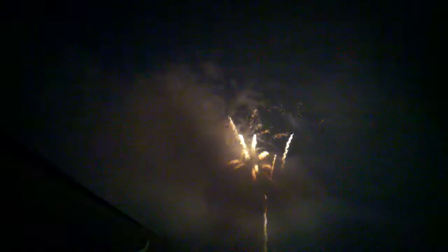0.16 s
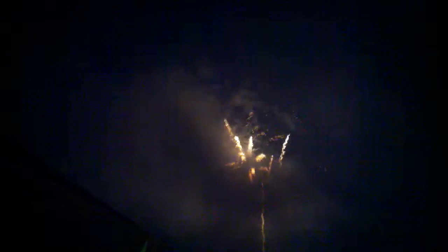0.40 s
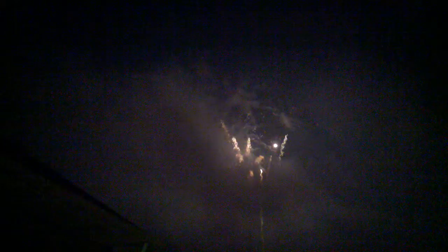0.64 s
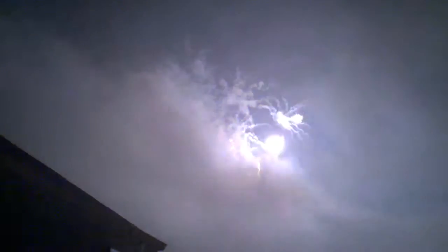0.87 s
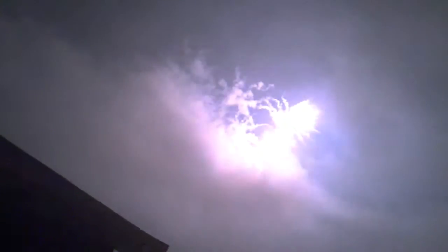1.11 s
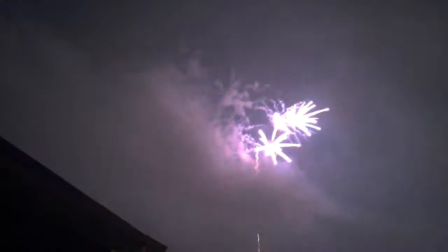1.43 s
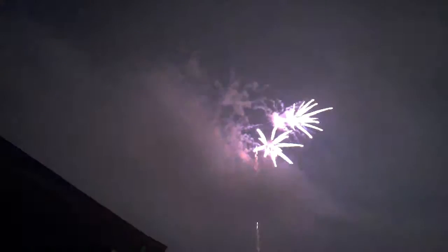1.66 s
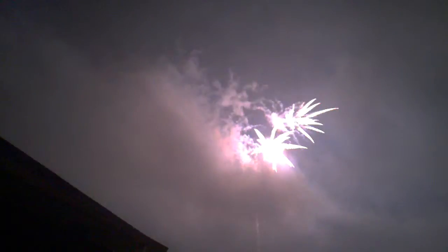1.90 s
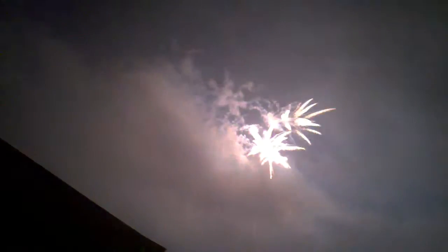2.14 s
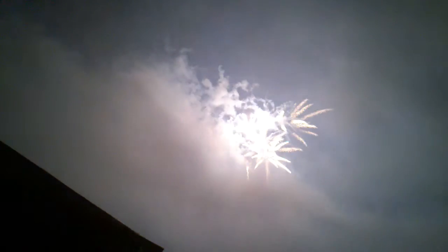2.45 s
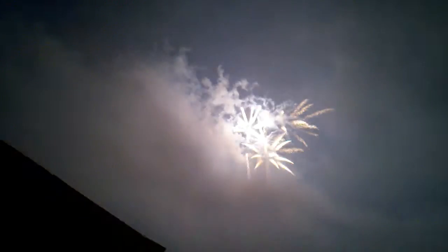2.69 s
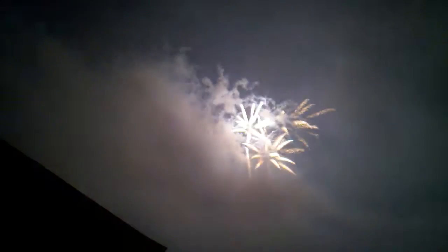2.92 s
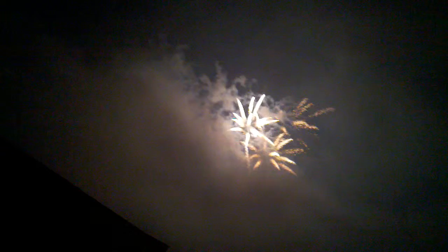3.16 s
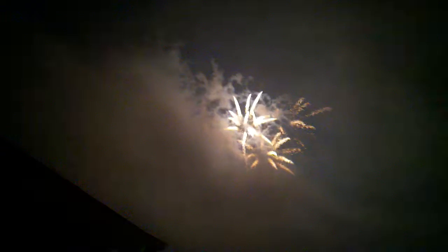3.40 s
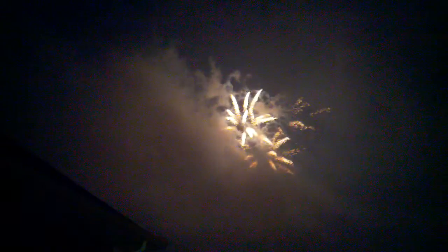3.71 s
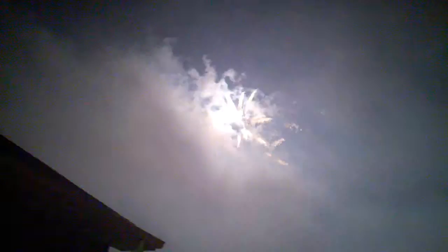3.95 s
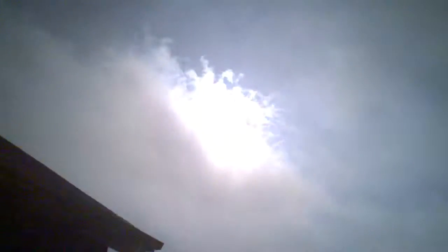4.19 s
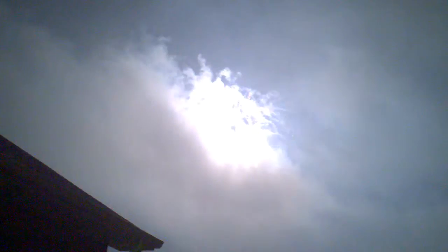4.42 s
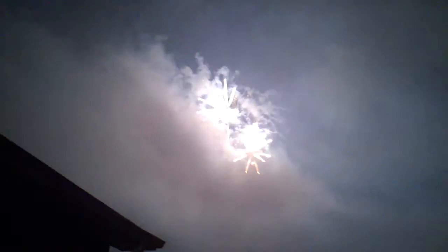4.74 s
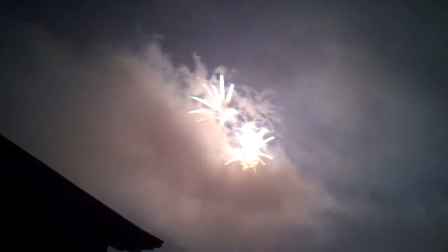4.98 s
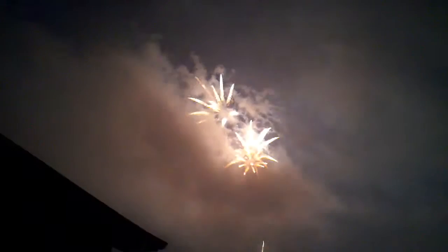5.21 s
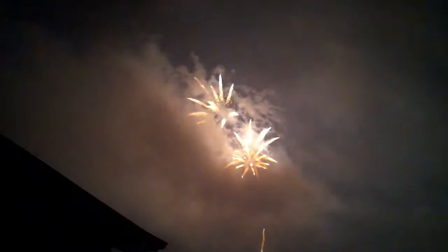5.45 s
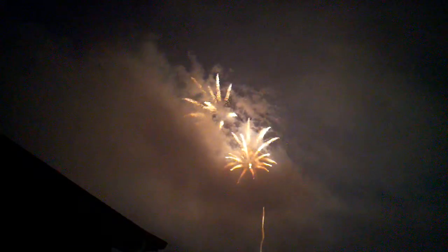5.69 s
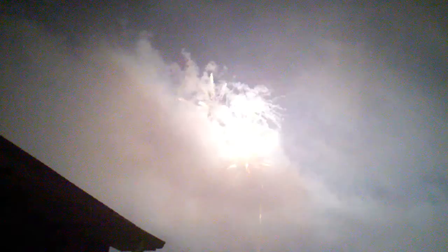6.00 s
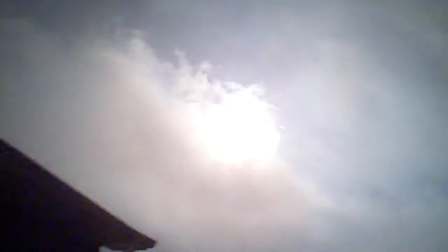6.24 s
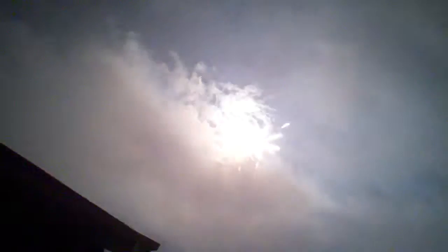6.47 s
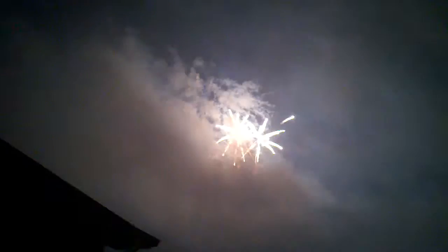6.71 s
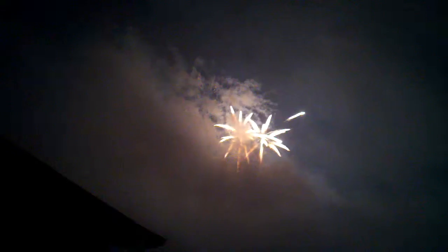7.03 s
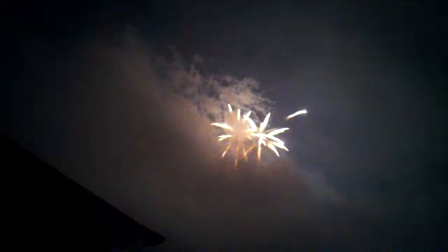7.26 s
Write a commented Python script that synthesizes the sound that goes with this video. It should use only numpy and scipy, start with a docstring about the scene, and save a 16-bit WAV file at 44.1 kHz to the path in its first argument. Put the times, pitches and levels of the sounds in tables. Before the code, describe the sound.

Outdoor night fireworks some way off. Two softer mortar launches crack and thump, then nine hard, dry shell bursts come irregularly over seven seconds, alone or in close pairs. Each is doubled almost instantly by its ground reflection and leaves a short tail. Houses return clattering echoes, and low rumble rolls on through a lull in the middle. A small stereo recorder adds light hiss, widens the image and clips the loudest peaks.

```python
"""Fireworks at night, some way off: shells burst overhead as sharp shocks that come twice, direct and then
off the ground. Mortars crack (ringing muzzle, noisy gas) and thump (a sagging low tone), with two faint far
bangs built the same way; walls, streets and open land send back echoes, built as short rings and shaped
noise over a rolling rumble. A small two-port recorder adds hiss, widens its stereo by delayed cross-feed
and clips the loudest peaks."""
import sys
import numpy as np
from scipy import signal
from scipy.fft import rfft, irfft, next_fast_len
from scipy.io import wavfile
from scipy.ndimage import uniform_filter1d

SR = 44100
rng = np.random.default_rng(int(sys.argv[2]) if len(sys.argv) > 2 else 0)


def boost_factor(decibels):
    """Convert a level in decibels to a linear amplitude factor."""
    exponent = np.asarray(decibels, float) / 20
    return 10 ** exponent


def dump(signal):
    """Clip the signal to [-1, 1] and save it as 16-bit WAV at the path in sys.argv[1]."""
    limited = np.clip(np.atleast_2d(signal).T, -1, 1)
    pcm = np.round(limited * 32767).astype(np.int16)
    wavfile.write(sys.argv[1], SR, pcm)


N = 325017
T = np.arange(N) / SR  # s

# shells bursting overhead: (time [s], level [dB], shock front against the burst [dB],
# ground bounce lag [ms], shock front against the bounce [dB])
SHELL_BURSTS = [(1.4620, -2.5, 1, 4.56, -13), (1.5845, -5, -13, 4.97, -7), (2.3732, -5.5, -7.5, 4.51, -13),
                (2.8355, -5, -11, 4.77, -14.5), (4.6344, -4, 0.5, 4.9, -4.5),
                (4.8570, -3.5, -4.5, 4.33, -7), (5.5116, -5.5, -1.5, 4.165, -25.5),
                (6.6327, -3, -12, 4.66, -11), (6.6464, -7, -7, 4.3, -4.5)]
# mortars firing, and two faint far bangs built the same way:
# (time [s], muzzle crack [dB], tube thump [dB], thump swell [ms], echo level [dB])
LAUNCHES_AND_FAR_BANGS = [(1.143, -17.5, -13.5, 5.2, -33), (1.2972, -18, -15.5, 3.7, -36),
                          (2.1556, -23, -22, 5.5, -40.5), (2.8955, -21.5, -21.5, 4.8, -38.5),
                          (3.1776, -20, -20.5, 4.4, -39.5), (4.9722, -20.5, -23, 3.1, -43.5),
                          (5.9549, -47, -36, 2.1, -75), (6.2066, -17.5, -21.5, 4.4, -41),
                          (7.107, -59, -32, 2, -63)]


def on_bins(points, count):
    """A (frequency [Hz], value) table read at every bin of a transform, along log frequency."""
    hz, value = np.transpose(points)
    return np.interp(np.log(np.fft.rfftfreq(count, 1 / SR) + 1), np.log(hz), value)


def diffuse(colour, count=N):
    """Coloured noise of rms 1 at two ports, alike in the bass and mostly unrelated in the treble."""
    # share of diffuse sound that is alike at both ports: (frequency [Hz], share [0-1])
    alike_shares = [(100, 0.93), (400, 0.83), (900, 0.4), (2000, 0), (5000, 0.1)]
    size = next_fast_len(count)
    alike = np.clip(on_bins(alike_shares, size), 0, 1)
    mid, side = rfft(rng.standard_normal((2, size)))
    ports = mid * np.sqrt(1 + alike) + side * np.sqrt(1 - alike) * np.array([[1], [-1]])
    out = irfft(ports * boost_factor(on_bins(colour, size)), size)[:, :count]
    return out / out.std()


def causal(points, size=1024):
    """Minimum-phase response of a (frequency [Hz], level [dB]) table, by folding the cepstrum."""
    cepstrum = irfft(np.log(boost_factor(on_bins(points, size))), size)
    cepstrum[1:size // 2] *= 2
    cepstrum[size // 2 + 1:] = 0
    return irfft(np.exp(rfft(cepstrum)), size)[:size // 2]


def add(out, s, sound):
    """Mix a sound in at time s."""
    i = int(round(s * SR))
    out[..., i:i + sound.shape[-1]] += sound[..., :N - i]


def flutter(rate, db):
    """Level that wanders as echoes from many distances come and go: rate [1/s], spread [dB]."""
    hold = int(SR / rate)
    steps = np.repeat(rng.standard_normal(N // hold + 1), hold)
    return boost_factor(db * uniform_filter1d(steps, hold)[:N])


def recorder_hiss():
    """Steady noise of the recorder, spread over both ports."""
    # (frequency [Hz], level [dB])
    hiss_colour = [(1000, -2), (6000, 2), (11000, 0.46), (13500, 2)]
    return boost_factor(-72.5) * diffuse(hiss_colour)


def rumble():
    """Low roll from far hills, lighter roar from nearer houses: bursts feed both, launches the roar."""
    # bursts before the start, whose echoes still roll: (time [s], level [dB])
    earlier_bursts = [(-1.95, -4.5), (-1.3, -4)]
    # what the land returns of a burst, houses first, hills later: (lag [s], low roll [dB], upper roar [dB])
    land = [(0.1, -59, -85), (0.24, -48.5, -53.5), (0.38, -51.5, -51), (0.5, -54, -52), (0.7, -49, -53.5),
            (0.95, -45, -53), (1.35, -45, -53.5), (1.6, -47.5, -57.5), (1.9, -52, -57.5), (2.3, -62, -56),
            (3.0, -68, -72)]
    # colours of roll and roar: (frequency [Hz], level [dB])
    roll_colour = [(30, -24), (60, -6.5), (100, -1), (250, 0), (420, -1.5), (600, -11), (900, -40),
                   (1500, -70)]
    roar_colour = [(300, -3.5), (600, 0), (800, 1.5), (1200, -2), (2200, -10), (4500, -26), (9000, -39.5)]
    night_roll_db, night_roar_db = -53, -73  # what remains between volleys
    launch_roar_db, launch_roar_s = -15, 0.14  # against the launch's echo level; time to its peak

    lag, roll_db, roar_db = np.transpose(land)
    # echoes add up as power
    roll_power = np.full(N, boost_factor(2 * night_roll_db))
    roar_power = np.full(N, boost_factor(2 * night_roar_db))
    for s, db in earlier_bursts + [row[:2] for row in SHELL_BURSTS]:
        roll_power += (T > s) * boost_factor(2 * (db + np.interp(T - s, lag, roll_db)))
        roar_power += (T > s) * boost_factor(2 * (db + np.interp(T - s, lag, roar_db)))
    for s, *_, echo_db in LAUNCHES_AND_FAR_BANGS:
        swell = np.clip(T - s, 0, None) / launch_roar_s
        roar_power += (boost_factor(echo_db + launch_roar_db) * swell * np.exp(1 - swell)) ** 2
    roll = np.sqrt(roll_power) * diffuse(roll_colour) * flutter(19, 1.0)
    roar = np.sqrt(roar_power) * diffuse(roar_colour) * flutter(25, 2.1)
    return roll + roar


def launches():
    """Gas cracks out of the muzzle, the tube thumps; the same walls answer each, and the far bangs too."""
    # walls: (lag [s], crack against the launch's echo level [dB], thump against the direct thump [dB])
    walls = [(.0100, 0, -8.5), (0.0392, -12, -32), (.056, -16, -20), (0.0685, 1.5, -25),
             (0.0805, -1.5, -15), (0.0859, -1.5, -25), (0.101, -14, -17), (0.1218, 2, -17),
             (.1307, -6, -35), (0.1462, -0.5, -16), (0.173, -14, -16), (0.184, -17, -14.5)]
    # streets of houses that scatter each launch: (lag [s], level against the echo level [dB], spread [ms])
    house_streets = [(0.078, -3.5, 9.8), (0.132, -8, 19), (.185, -11.5, 22.0)]
    # colour of the street scatter: (frequency [Hz], level [dB])
    street_colour = [(200, 8.5), (550, -9), (1100, 1), (1800, -1), (3500, -18), (8000, -20.5),
                     (14000, -103)]
    # late scatter: (level against the echo level [dB], 60 dB decay [s], colour (frequency [Hz], level [dB]))
    haze_scatter = (-7.5, 1.43, [(60, -15), (140, 23), (400, -22), (1100, -11), (2200, -4.5), (4500, -11.5),
                    (9000, -19.5), (14000, -56)])
    smear_ms = 1.292  # how long a rough wall draws out a crack

    direct, slaps, street_power, haze_power = np.zeros((4, N))
    t, long = T[:4000], T[:SR]
    haze_db, haze_t60, haze_colour = haze_scatter
    gas_band = signal.butter(1, [1100, 4500], "band", fs=SR, output="sos")
    for s, crack_db, thump_db, swell_ms, echo_db in LAUNCHES_AND_FAR_BANGS:
        muzzle = np.cos(2 * np.pi * 1550 * t) * np.exp(-t / 0.0005) * (1 - np.exp(-t / 0.00004))
        gas = signal.sosfilt(gas_band, rng.standard_normal(len(t)))
        crack = muzzle + 0.31 * gas * np.exp(-(t / 0.0044) ** 2)
        # the thump starts higher and sags as the gas cools
        sagging = np.cos(2 * np.pi * 135 * (t - 0.0015 * np.exp(-t / 0.0036)) + 1.2)
        swell = t * 1000 / swell_ms
        thump = boost_factor(thump_db) * sagging * swell * np.exp(1 - swell)
        add(direct, s, boost_factor(crack_db) * crack + thump)

        for lag, db, low_db in walls:
            # a rough wall smears the crack into a short ring of its own, falling in pitch
            chance_db, pitch, turn = rng.random(3) * [4, 1, 1]
            falling = np.cos(2 * np.pi * ((950 + 650 * pitch) * t * (1 - 40 * t) + turn))
            ring = falling * np.exp(-(t * 1000 / smear_ms - 2) ** 2)
            # started early so that the ring peaks at the wall's lag
            add(slaps, s + lag - 2 * smear_ms / 1000, boost_factor(echo_db + db + chance_db) * ring)
            add(slaps, s + lag, boost_factor(low_db) * thump)
        for lag, db, spread_ms in house_streets:
            spread = np.exp(-((long - lag) * 1000 / spread_ms) ** 2)
            add(street_power, s, boost_factor(2 * (echo_db + db)) * spread)
        build_up = np.clip(long / 0.058, 0, 1) ** 2
        add(haze_power, s, boost_factor(2 * (echo_db + haze_db - 60 * long / haze_t60)) * build_up)
    streets = np.sqrt(street_power) * diffuse(street_colour) * flutter(250, 3.6)
    haze = np.sqrt(haze_power) * diffuse(haze_colour) * flutter(340, 1.5)
    return direct, slaps + streets + haze


def bursts():
    """Shock front, then the air swings under and over and settles; the ground repeats it."""
    # scattering after a burst, close, near and far:
    # (level against the burst [dB], 60 dB decay [s], colour (frequency [Hz], level [dB]))
    close_scatter = (-22.5, 0.05, [(100, -24), (250, 0), (500, -7), (1200, 0.5), (2200, -13.5), (5000, -24),
                     (14000, -35)])
    near_scatter = (-28, 0.5, [(60, -55), (150, 1), (280, 8.5), (450, -0.5), (800, -14), (2000, -20),
                    (5000, -48), (14000, -37)])
    far_scatter = (-55.5, 1.98, [(300, -14.5), (1000, -18), (2500, 7.5), (5000, 2), (10000, -3.5),
                   (14000, -32)])
    swing_hz, bounce_db = 292, -0.1  # pressure swing; ground bounce against direct

    direct, close_power, near_power, far_power = np.zeros((4, N))
    t = T[:1200]
    swing = 0.81 * np.cos(2 * np.pi * swing_hz * t) * np.exp(-(t / 0.0029) ** 2)
    kick = 1.02 * (1 - t / 0.00027) * np.exp(-t / 0.0004)
    # soft ground rounds the rise
    sharp = (swing + kick) * (1 - np.exp(-t / 0.0001))
    dull = (swing + kick) * (1 - np.exp(-t / 0.0002))
    for s, db, front_db, lag_ms, bounce_front_db in SHELL_BURSTS:
        crackle = boost_factor(-8.5) * rng.standard_normal(len(t)) * np.exp(-t / 0.00041)
        front = (1 - t / 0.000094) * np.exp(-t / 0.00007) + crackle
        add(direct, s, boost_factor(db) * (sharp + boost_factor(front_db) * front))
        bounce = dull + boost_factor(bounce_front_db) * front
        add(direct, s + lag_ms / 1000, boost_factor(db + bounce_db) * bounce)
        for power, (tail_db, t60, _) in ((close_power, close_scatter), (near_power, near_scatter),
                                         (far_power, far_scatter)):
            add(power, s + 0.0028, boost_factor(2 * (db + tail_db - 60 * T / t60)))
    close = np.sqrt(close_power) * diffuse(close_scatter[2])
    near = np.sqrt(near_power) * diffuse(near_scatter[2]) * flutter(200, 2.1)
    far = np.sqrt(far_power) * diffuse(far_scatter[2])
    # a small charge far off radiates little deep bass
    direct = signal.sosfilt(signal.butter(2, 105, "high", fs=SR, output="sos"), direct)
    return direct, close + near + far


def scene():
    """Direct sound reaches the left port first; the right port has its own colour."""
    # colour of direct sound at the microphone: (frequency [Hz], level [dB])
    direct_colour = [(1000, 1.5), (3000, 5.5), (6000, 5.5), (9000, 2), (11500, 0), (14000, -11)]
    # direct sound comes from the left and above, so the body shades the right port:
    # (frequency [Hz], level [dB])
    body_shade = [(1500, 2), (3000, -8), (6000, -27), (10000, -14), (14000, 1)]
    # right port against left: (frequency [Hz], level [dB])
    right_port = [(40, 3), (120, 1.5), (400, 3), (1100, 1.5), (1700, 6), (2300, 1.5), (3200, 2.5),
                  (6000, -1.5), (14000, -0.5)]
    port_lag = 1  # samples

    land = rumble()
    mortar, echoes = launches()
    shell, tails = bursts()
    direct = signal.fftconvolve(shell + mortar, causal(direct_colour))[:N]
    shaded = np.roll(signal.fftconvolve(direct, causal(body_shade))[:N], port_lag)
    left, right = np.array([direct, shaded]) + tails + echoes + land
    return np.array([left, signal.fftconvolve(right, causal(right_port))[:N]])


def widen(x):
    """Stereo widening: each side loses a delayed, filtered share of the other."""
    # share fed to the other side: (frequency [Hz], share [0-1]);
    # the left channel takes less treble from the right than it gives
    feed_to_left = [(300, 0.79), (2600, 0.88), (4000, 0.82), (5300, 0.13), (8000, 0), (14000, 0.1)]
    feed_to_right = [(300, 0.9), (4000, 0.85), (14000, 0.69)]
    cross_lag = 17  # samples
    size = next_fast_len(N)
    shares = np.clip([on_bins(feed_to_left, size), on_bins(feed_to_right, size)], 0, 1)
    other = irfft(rfft(x[::-1], size) * shares, size)[:, :N]
    return x - np.roll(other, cross_lag, axis=1)


def top_cut(x):
    """Nothing passes above the cut-off."""
    return signal.sosfilt(signal.butter(12, 16520, fs=SR, output="sos"), x)


def record(dry):
    """Small two-port recorder: hiss, bass cut, stereo widening, top cut and clipping."""
    x = dry + recorder_hiss()
    x = signal.sosfilt(signal.butter(3, 75, "high", fs=SR, output="sos"), x)
    x = widen(x)
    # steep top cut, 50 dB down from 14350 Hz
    x = signal.sosfilt(signal.cheby2(16, 50, 14350, fs=SR, output="sos"), x)
    mix = np.clip(x, -1, 1)
    return top_cut(mix)


dry = scene()
out = record(dry)
dump(out)
```